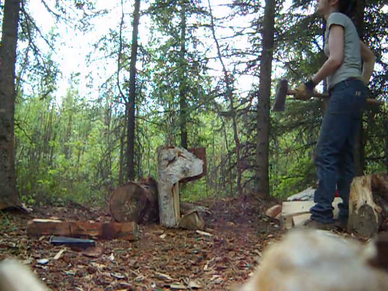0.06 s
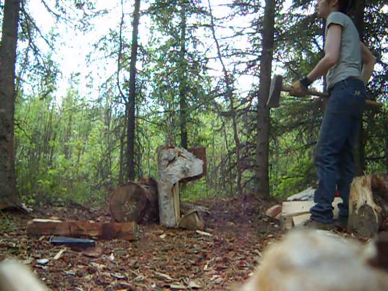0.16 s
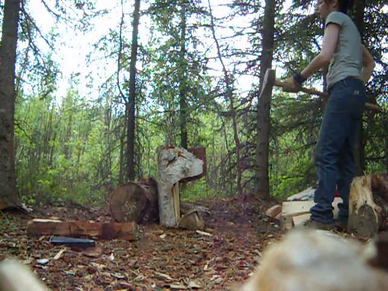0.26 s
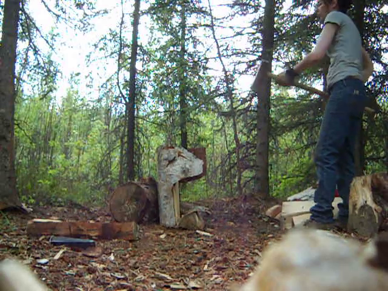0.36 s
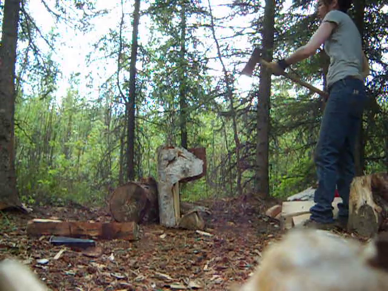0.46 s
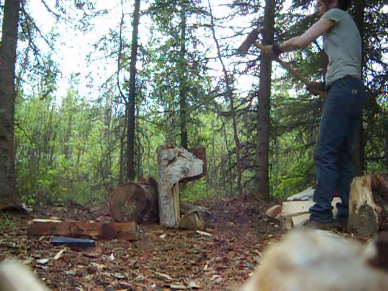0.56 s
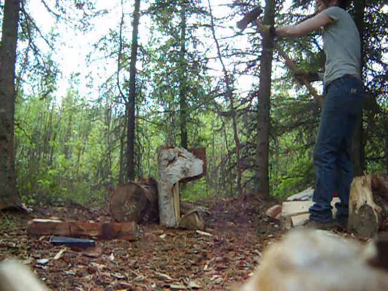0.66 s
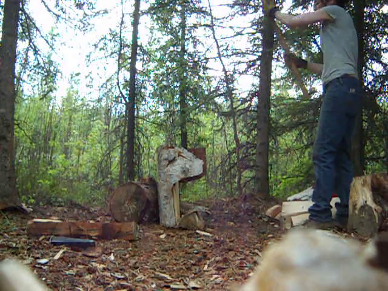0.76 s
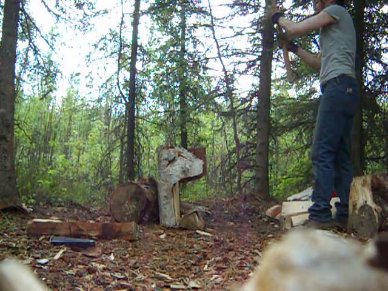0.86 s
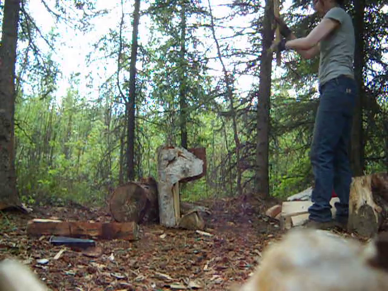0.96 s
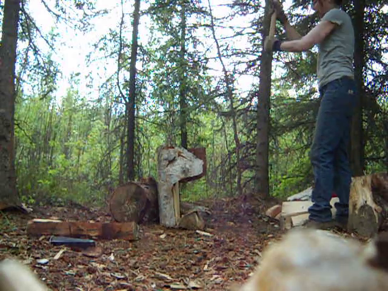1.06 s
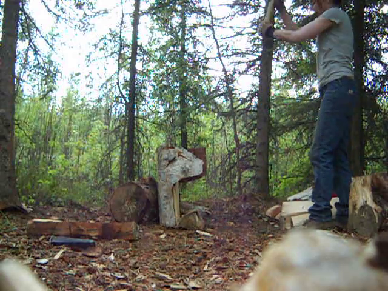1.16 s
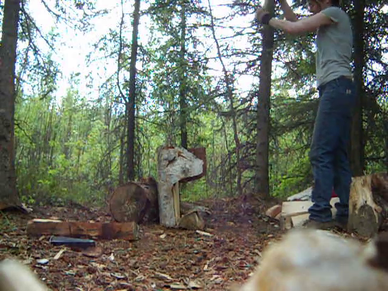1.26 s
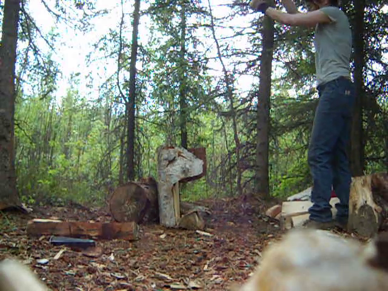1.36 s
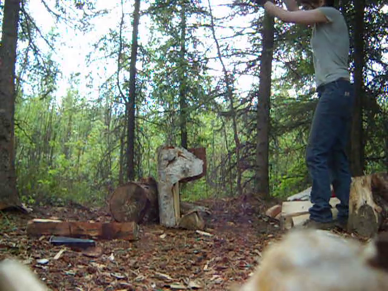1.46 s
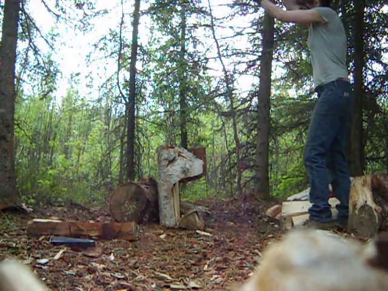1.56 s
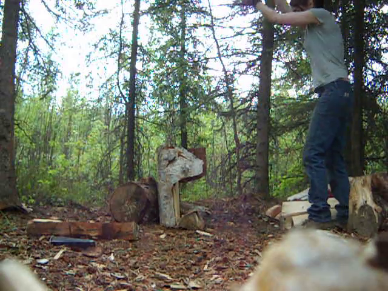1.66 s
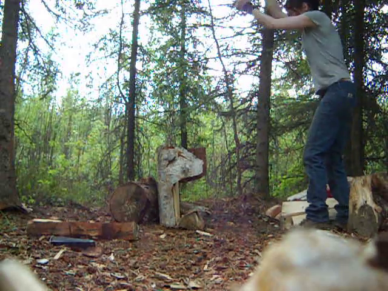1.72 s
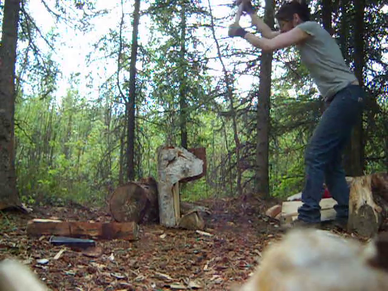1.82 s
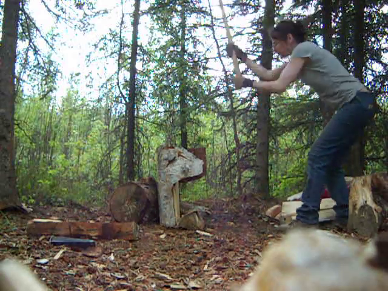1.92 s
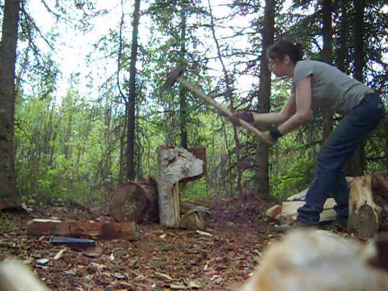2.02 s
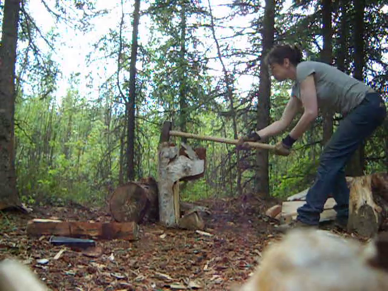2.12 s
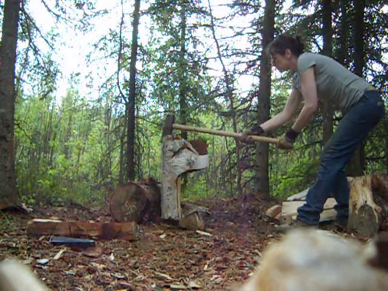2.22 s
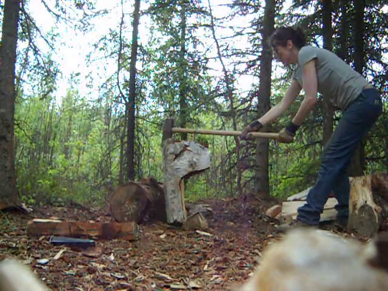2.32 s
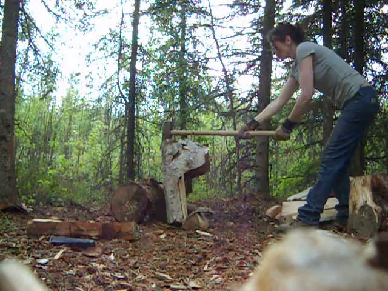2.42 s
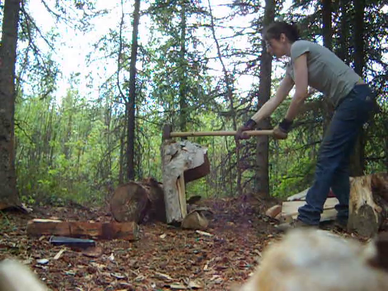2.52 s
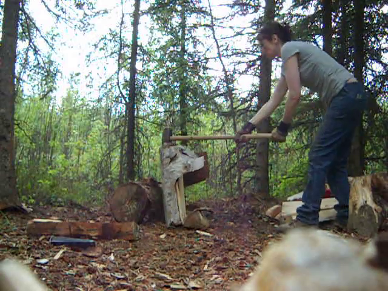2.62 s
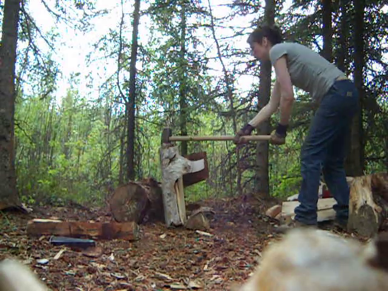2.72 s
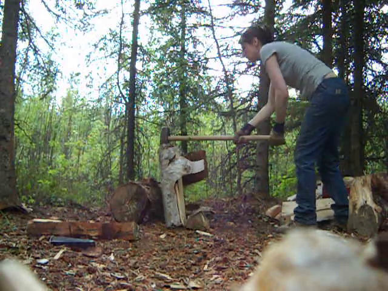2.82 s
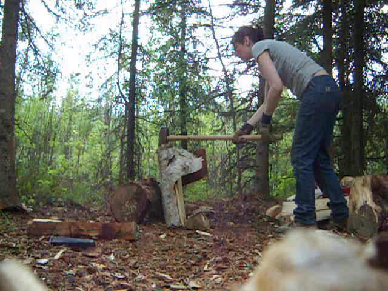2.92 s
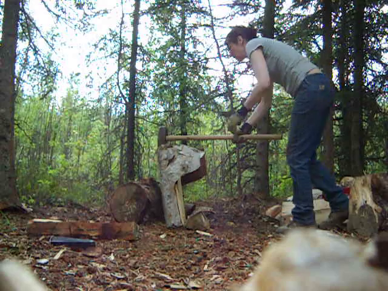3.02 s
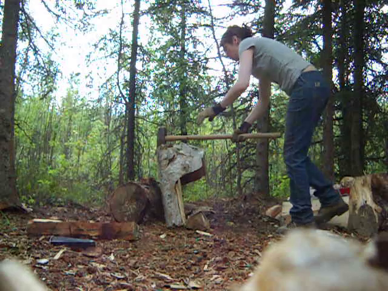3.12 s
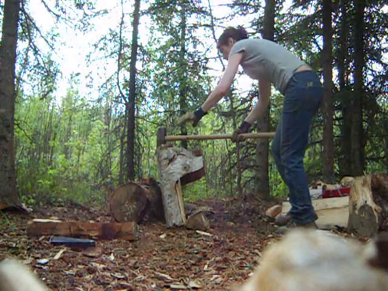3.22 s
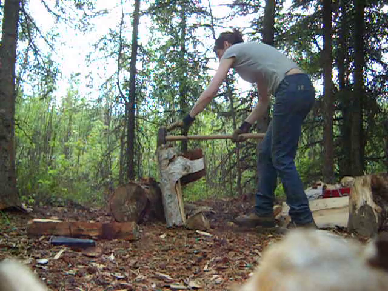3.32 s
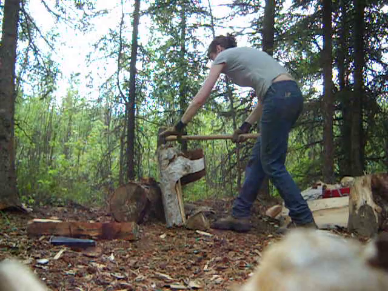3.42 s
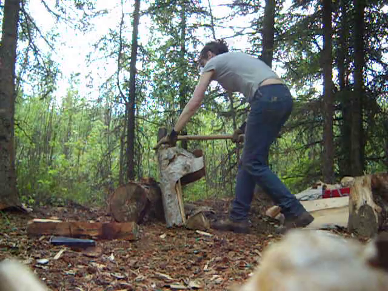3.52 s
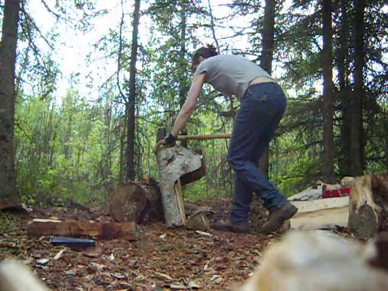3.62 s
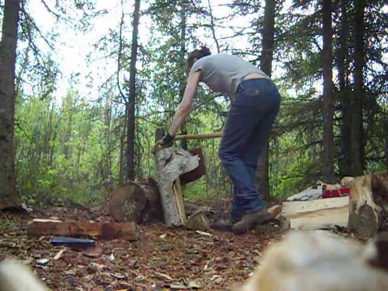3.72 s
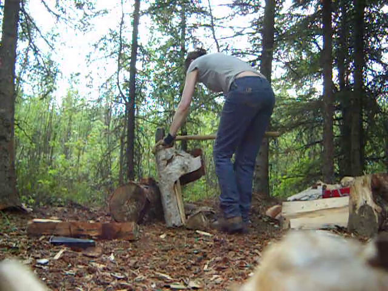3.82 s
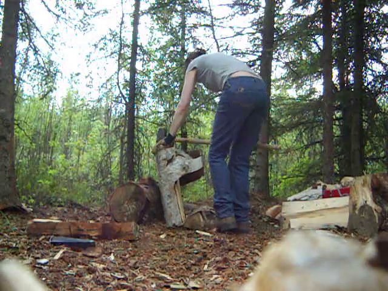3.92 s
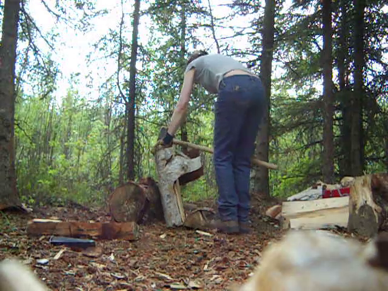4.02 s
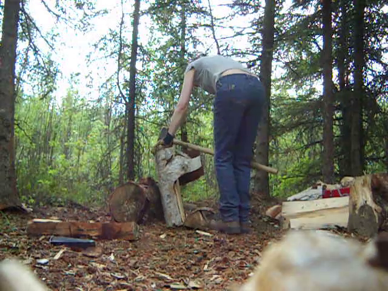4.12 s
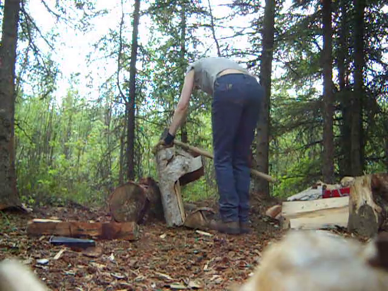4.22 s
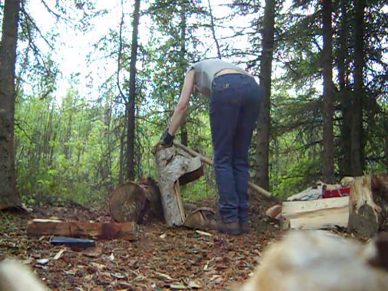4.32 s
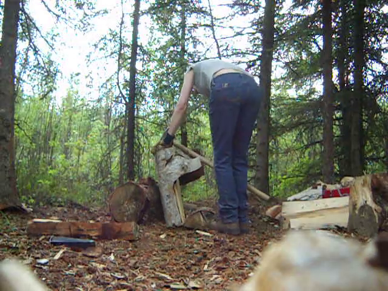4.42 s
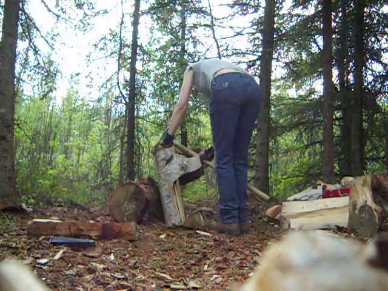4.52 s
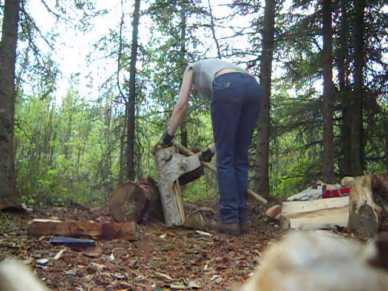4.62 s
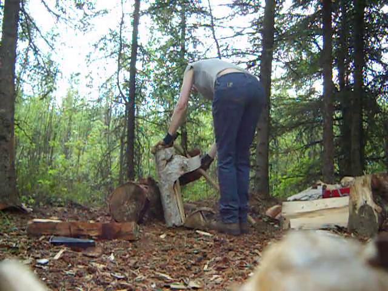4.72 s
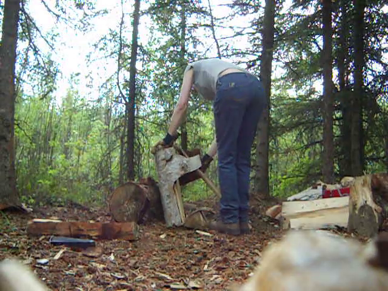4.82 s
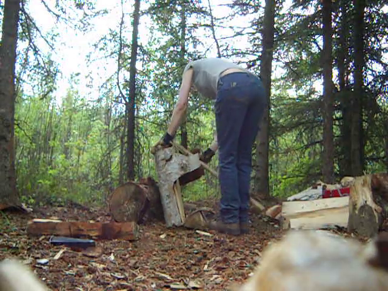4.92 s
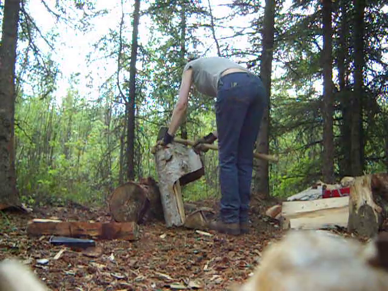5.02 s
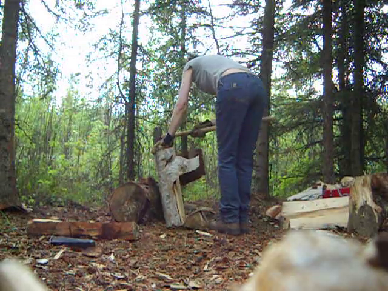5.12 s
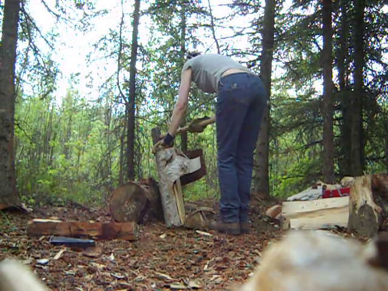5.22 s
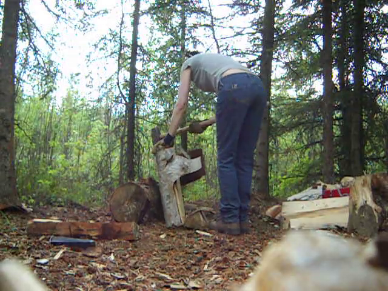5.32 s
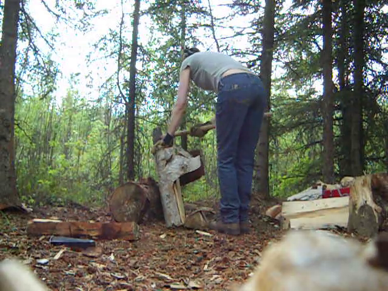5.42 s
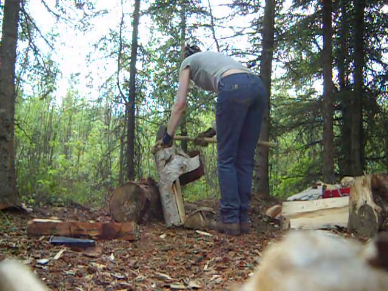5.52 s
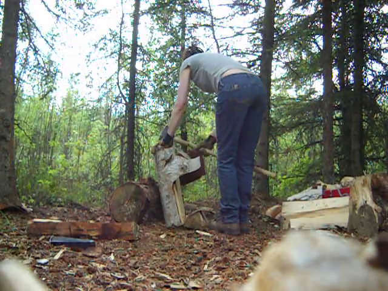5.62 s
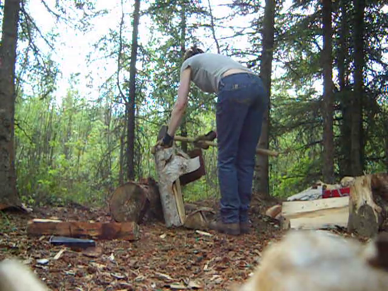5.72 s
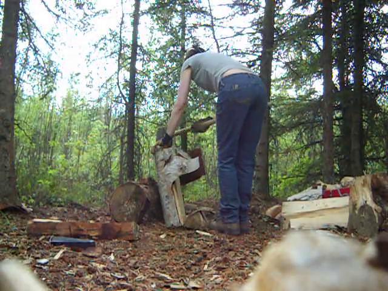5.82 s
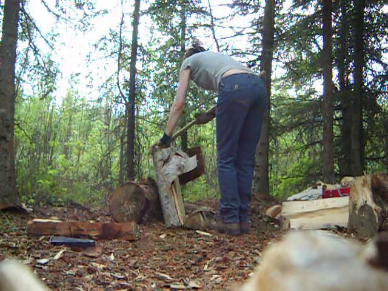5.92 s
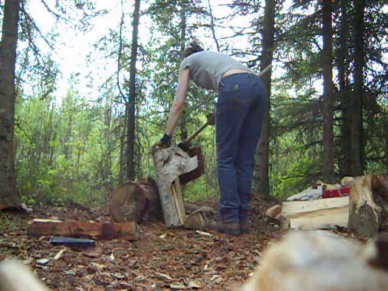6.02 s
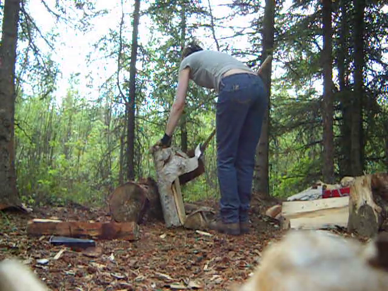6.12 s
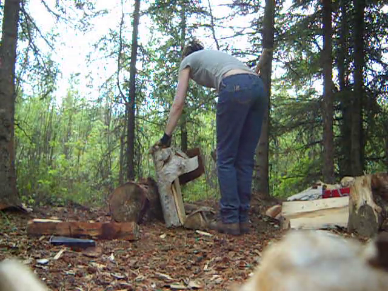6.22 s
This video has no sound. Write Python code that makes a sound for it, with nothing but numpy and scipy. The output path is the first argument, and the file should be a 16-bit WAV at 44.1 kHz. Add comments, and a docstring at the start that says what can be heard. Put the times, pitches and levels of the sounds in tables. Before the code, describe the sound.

One heavy maul blow cracks into a log with a woody, steely clank and forest echo, then light knocks and a final slab clatter over hiss.

```python
"""A heavy maul drives a steel wedge into a standing log: ringing tones, a burst of tearing wood and a low thump.
The wood then splits in jerks, the tool knocks as it is worked loose, and a loose slab clatters: short damped tones
and noise bursts. Feet shift on wood chips (swelling grains of noise), and forest trunks return dense echoes.
A small camera on the ground hears it all through a narrow band over steady hiss, and flattens the loudest peaks."""
import sys
import numpy as np
from scipy import signal
from scipy.fft import rfft, irfft
from scipy.io import wavfile

SR = 44100
rng = np.random.default_rng(int(sys.argv[2]) if len(sys.argv) > 2 else 0)


def waveform_to_disk(signal):
    """Save audio, clipped to [-1, 1], as 16-bit WAV at the path in sys.argv[1]."""
    frames = np.transpose(np.atleast_2d(signal))
    scaled = np.clip(frames, -1, 1) * 32767
    samples = np.round(scaled).astype(np.int16)
    wavfile.write(sys.argv[1], SR, samples)


N = 276225

# Maul, wedge and log ringing together. Each row: tone in Hz, level in dB, time to fall by 60 dB in seconds.
WEDGE_TONES = [(155, -11, 0.04), (221, -7, 0.039), (265, -8, 0.048), (392.4, -4.5, 0.044), (503, -2, 0.036),
               (669, 4, 0.024), (770.6, 3.5, 0.029), (927, -7, 0.036), (1132, -15, 0.029),
               (1443, -5.5, 0.027), (1645, -4, 0.022), (2006, -9, 0.025), (2385, 1.5, 0.017),
               (2460, -10, 0.027), (2860, -18, 0.038), (3100, -20.5, 0.044), (3423, -11.5, 0.027),
               (3620, -8, 0.018)]
# After the blow the log lands on the ground, then the split gives way in jerks. Each row: start in seconds,
# peak level in dB, pitch ratio.
SPLIT_JERKS = [(2.152, -25.5, 1.2), (2.186, -27.5, 0.66), (2.230, -28, 1.8), (2.2919, -28, 0.9)]
# The tool knocks on the log as it is worked loose.
# Each row: start in seconds, peak of the thump in dB, level of the steel tick in dB, pitch ratio of the thump.
TOOL_KNOCKS = [(2.612, -42, -39, 0.63), (2.663, -59, -39, 1), (3.107, -40.5, -47.5, .6),
               (3.502, -43.5, -58, 0.91), (3.598, -58, -41.5, 1.1), (3.9009, -32, -36, 0.73),
               (4.2216, -46, -43.5, 1.01), (4.6, -44.5, -43, 1.13), (4.6178, -22, -31, 0.97),
               (4.816, -41.5, -55, 0.514), (5.0843, -27, -33.5, 0.94), (5.116, -39, -48, .9),
               (6.038, -39, -43.5, 0.55)]
# The log under a light knock, at pitch ratio 1.
# Each row: tone in Hz, relative level in dB, time to fall by 60 dB in seconds.
LOG_TONES = [(175, -5.5, 0.029), (231.5, -4.5, 0.037), (310, -4.5, 0.043), (456, 0.5, 0.038),
             (814, -4.5, 0.031), (918, 3, 0.025), (1187, -9, 0.035), (1345, -23, 0.011), (2010, -12, 0.021),
             (2200, -21.5, 0.036), (2860, -20.5, 0.0075)]
# The loose slab of wood, at pitch ratio 1.
# Each row: tone in Hz, relative level in dB, time to fall by 60 dB in seconds.
SLAB_TONES = [(137, -8.5, 0.019), (245, -9.5, 0.015), (322, 1.5, 0.017), (394, -16.5, 0.051),
              (570, -21, 0.077), (646, -3, 0.032), (718, -4, 0.048), (1167, -38, 0.0102),
              (2020, -13, 0.0166), (3500, -16, 0.022)]
# The slab lands and rocks over onto its other end.
# Each row: start in seconds, peak of the landing in dB, peak of the rebound in dB, rocking time in seconds, pitch ratio.
SLAB_LANDINGS = [(6.0976, -20.5, -20.5, 0.027, 1.07), (6.1376, -15, -27, .0243, 1.002),
                 (6.2002, -30, -32, .0285, 0.85)]
# The swing, the recovery and each shift of weight.
# Each row: middle in seconds, length in seconds, rubbing level in dB, crunching level in dB.
MOVEMENTS = [(1.866, 0.17, -53.5, -67), (2.609, 0.31, -54, -58.5), (3.096, 0.19, -57.5, -63.5),
             (3.482, 0.23, -62, -78), (3.885, 0.18, -57.5, -69), (4.605, .1, -55.5, -68),
             (5.1, 0.11, -60, -59), (5.922, 0.19, -62, -60)]
# Boots coming down on soft ground. Each row: start in seconds, level in dB.
BOOT_STEPS = [(3.832, -35.5), (3.925, -31.5)]
# Balance of low and high in each noise or echo. Each row: frequency in Hz, relative level in dB per Hz.
CLICK_COLOUR = [(100, -3), (600, 5.5), (1500, -7.5), (2300, -1.5), (4000, -9)]
RUBBING_COLOUR = [(40, -16.5), (150, -4.5), (400, 1.5), (750, -2), (1200, -19), (4000, -31)]
CRUNCH_COLOUR = [(300, -15), (900, -9.5), (1600, -3.5), (3000, 2), (4500, 1)]
NEAR_TRUNKS_COLOUR = [(30, -5.5), (150, 0), (380, 5.5), (600, 1), (870, 12.5), (1150, -6), (1800, -7.5),
                      (2250, -1.5), (2700, -3), (4000, -7.5)]
TREE_LINE_COLOUR = [(30, 6), (100, 10), (400, -1.5), (600, 5.5), (800, 13.5), (1050, 1.5), (1260, -2),
                    (1700, -7.5), (2300, -1), (4000, -12.5)]
HISS_COLOUR = [(20, -2), (60, -3), (143, -6), (178, -4), (258, -6), (445, -7), (751, -8), (3700, -14.5),
               (4810, -24.5)]

TIME = np.arange(N) / SR
HIT_TIME = TIME[:SR // 3]   # time within one hit, in seconds

BLOW_S = 2.134
DRIVE_S, TOUCH_S = 0.0015, 0.0007   # how gradually the tones build up: blow, light touch
TEAR_DB, TEAR_T60 = -10.5, 0.036
SNAP_DB, SNAP_FADE_DB_PER_S = 3.5, 126.5   # snapping fibres against the jerk; they fade as the strain is spent
SPLINTER_T60 = 0.031
SCUFF_DB = -6   # energy of the scuff against the first touch
SEAT_S, SEAT_SCUFF_S = 0.00311, 0.018   # the steel ticks first, then seats in the wood with a scuff
TICK_T60 = 0.054
EDGE_SHARE, EDGE_DB, EDGE_PITCH = 0.68, -6, 0.735   # part of the way over, an edge catches (dB against the rebound)
REBOUND_PITCH, SLAB_SCUFF_S = 0.902, 0.0026
SPLINTER_DB, SPLINTER_FOLLOWS = -22, 0.69   # click of a full-scale contact; dB per dB of contact level
LANDING_THUD_DB, THUD_FOLLOWS = 15.5, 1.74   # thud of a full-scale landing; dB per dB, so light landings barely thud
STIR_DB = -68.5   # faint stirring between the movements
REPORT_DB, LIGHT_ECHO_DB = 26.0, -11.5   # sent out to the trees; light contacts send less
BAND_EDGE_HZ, CUTOFF_HZ = 3773, 17000
OVERLOAD = 0.69   # ceiling for the loudest peaks


def from_db(db):
    """Turn decibels into gain."""
    return 10 ** (np.asarray(db) / 20)


def rms_one(x):
    """Scale a sound so that its average strength (rms) is one."""
    return x / np.sqrt(np.mean(x ** 2) + 1e-20)


def dying(t, t60):
    """Fade steadily in dB from t = 0, by 60 dB every t60 seconds; silent before."""
    return (t >= 0) * from_db(-60 * np.abs(t) / t60)


def add(track, s, sound):
    """Mix a sound into the track, starting at s seconds."""
    start = int(round(s * SR))
    track[start:start + len(sound)] += sound[:N - start]


def coloured(x, colour):
    """Shape the spectrum of noise or clicks, cut it off at 4600 Hz and set its rms to one."""
    hz, db = np.transpose(colour)
    bins_hz = np.maximum(np.arange(len(x) // 2 + 1) * SR / len(x), 1)
    gain = from_db(np.interp(np.log(bins_hz), np.log(hz), db))
    gain = gain * (bins_hz < 4600)
    return rms_one(irfft(rfft(x) * gain, len(x)))


def grains(size, per_s, spread_db):
    """Scatter random clicks of uneven strength and either sign."""
    born = rng.random(size) < per_s / SR
    sign = rng.choice([-1, 1], size)
    strength = from_db(spread_db * np.clip(rng.standard_normal(size), -2, 2))
    return born * sign * strength


def ringing(tones, contact_s, pitch):
    """A struck body sounds several fading tones, which build up more slowly when the contact is longer."""
    out = np.zeros(len(HIT_TIME))
    for hz, db, t60 in tones:
        wave = np.sin(2 * np.pi * hz * pitch * HIT_TIME)
        out += from_db(db) * wave * dying(HIT_TIME, t60)
    return out * (1 - np.exp(-HIT_TIME / contact_s))


def crack(t60):
    """A short, dense burst of fading noise, as from snapping fibres."""
    return coloured(rng.standard_normal(len(HIT_TIME)), CLICK_COLOUR) * dying(HIT_TIME, t60)


def thud(hz, t60):
    """The ground gives and springs back: a low tone builds up over about one cycle and dies away."""
    build_up = 1 - np.exp(-hz * HIT_TIME)
    return np.sin(2 * np.pi * hz * HIT_TIME) * build_up * dying(HIT_TIME, t60)


def contact(tones, db, scuff_s, pitch):
    """A light contact: a touch and a short noisy scuff set the body's tones ringing."""
    scuff = rng.standard_normal(len(HIT_TIME)) * np.exp(-HIT_TIME / scuff_s)
    force = from_db(SCUFF_DB) * scuff / np.linalg.norm(scuff)
    force[0] += 1   # the touch itself
    body = signal.fftconvolve(force, ringing(tones, TOUCH_S, pitch))[:len(HIT_TIME)]
    # the contact's sound is thinned below about 130 Hz
    low_cut = signal.butter(2, 130, "high", fs=SR, output="sos")
    body = signal.sosfilt(low_cut, body)
    return from_db(db) * body / np.abs(body).max()


def blow():
    """The wedge rings and the wood tears as it is driven in, then the log thumps the ground."""
    out = np.zeros(N)
    add(out, BLOW_S, ringing(WEDGE_TONES, DRIVE_S, pitch=1))
    add(out, BLOW_S, from_db(TEAR_DB) * crack(TEAR_T60))
    add(out, BLOW_S + 0.005, thud(hz=41, t60=0.076))
    return out


def splitting():
    """The log lands on the ground, then the slab jerks away from it; the snap of fibres weakens against each
    contact as the strain is spent."""
    out = np.zeros(N)
    for s, db, pitch in SPLIT_JERKS:
        snap_db = db + SNAP_DB - SNAP_FADE_DB_PER_S * (s - BLOW_S)
        add(out, s, contact(SLAB_TONES, db, scuff_s=0.00293, pitch=pitch))
        add(out, s, from_db(snap_db) * crack(SPLINTER_T60))
    return out


def tool_knocks():
    """Each knock is a short noisy tick of steel, then a thump that rings the log."""
    out = np.zeros(N)
    for s, thump_db, tick_db, pitch in TOOL_KNOCKS:
        add(out, s, from_db(tick_db) * crack(TICK_T60))
        add(out, s + SEAT_S, contact(LOG_TONES, thump_db, SEAT_SCUFF_S, pitch))
    return out


def clatter():
    """The slab thuds on the ground and rocks: one end, an edge and the other end touch in turn."""
    out = np.zeros(N)
    for s, landing_db, rebound_db, rock_s, pitch in SLAB_LANDINGS:
        thud_db = LANDING_THUD_DB + THUD_FOLLOWS * landing_db
        add(out, s, from_db(thud_db) * thud(hz=290, t60=0.02))
        # each touch: delay in seconds, peak level in dB, pitch ratio, extra click in dB
        touches = [(0, landing_db, 1, 0),
                   (EDGE_SHARE * rock_s, rebound_db + EDGE_DB, EDGE_PITCH, 8.0),
                   (rock_s, rebound_db, REBOUND_PITCH, 0)]
        for lag_s, db, ratio, extra_click_db in touches:
            click_db = SPLINTER_DB + SPLINTER_FOLLOWS * db + extra_click_db
            add(out, s + lag_s, contact(SLAB_TONES, db, SLAB_SCUFF_S, pitch * ratio))
            add(out, s + lag_s, from_db(click_db) * crack(SPLINTER_T60))
    return out


def movement():
    """Each movement swells and fades: cloth rubs and chips crunch in fine grains; boots land with thuds."""
    rubbing = crunching = from_db(STIR_DB)
    for s, length_s, rubbing_db, crunching_db in MOVEMENTS:
        swell = np.exp(-(2 * (TIME - s) / length_s) ** 2)
        rubbing = rubbing + from_db(rubbing_db) * swell
        crunching = crunching + from_db(crunching_db) * swell
    out = rubbing * coloured(grains(N, per_s=900, spread_db=5.0), RUBBING_COLOUR)
    out += crunching * coloured(grains(N, per_s=620, spread_db=7.0), CRUNCH_COLOUR)
    for s, db in BOOT_STEPS:
        add(out, s, from_db(db) * thud(hz=130, t60=0.065))
    return out


def echoes(colour, delay_s, rise_s, t60):
    """Many trunks each throw back a small echo; together they swell and fade, with about unit gain in the band."""
    t = TIME[:SR]
    rise = 1 - np.exp(-np.maximum(t - delay_s, 0) / rise_s)
    swell = rise * dying(t - delay_s, t60)
    response = coloured(grains(SR, per_s=5100, spread_db=3.5), colour) * swell
    return response / np.linalg.norm(response) * np.sqrt(2 * BAND_EDGE_HZ / SR)


def clearing(x):
    """Sound returns from the clearing: nearby trunks scatter it early and the tree line answers later."""
    near = from_db(-14.0) * echoes(NEAR_TRUNKS_COLOUR, delay_s=0.012, rise_s=0.0011, t60=0.21)
    far = from_db(-21.0) * echoes(TREE_LINE_COLOUR, delay_s=0.062, rise_s=0.0042, t60=0.56)
    return signal.fftconvolve(x, near + far)[:N]


def hiss():
    """Steady microphone hiss and the faint air of the forest, as one shaped noise."""
    return from_db(-54.0) * coloured(rng.standard_normal(N), HISS_COLOUR)


def scene():
    """The blow and the light contacts sound in the clearing, over movement and hiss."""
    light = splitting() + tool_knocks() + clatter()
    outward = from_db(LIGHT_ECHO_DB) * light
    # summed over all directions, the blow is one sharp report
    add(outward, BLOW_S, from_db([REPORT_DB]))
    mix = blow() + light + clearing(outward) + movement() + hiss()
    return mix[None]


def record(dry):
    """The camera passes only a narrow band, flattens the loudest peaks, and cuts the very top."""
    band = signal.butter(18, BAND_EDGE_HZ, fs=SR, output="sos")
    narrow = signal.sosfilt(band, dry)
    flattened = narrow / (1 + (narrow / OVERLOAD) ** 10) ** (1 / 10)
    top_cut = signal.cheby2(12, 70, CUTOFF_HZ, fs=SR, output="sos")
    return signal.sosfilt(top_cut, flattened)


dry = scene()
out = record(dry)
waveform_to_disk(out)
```